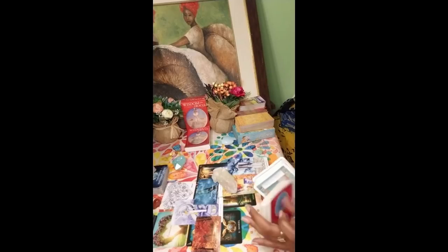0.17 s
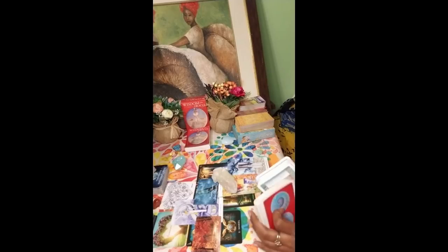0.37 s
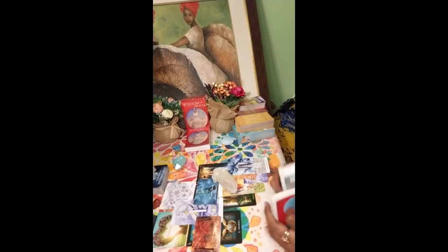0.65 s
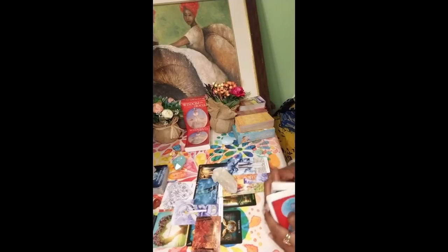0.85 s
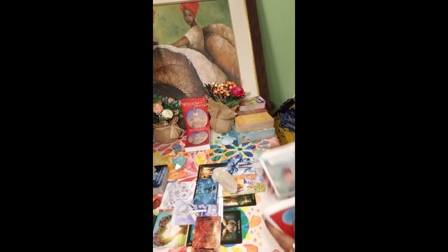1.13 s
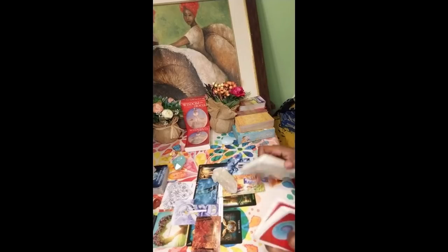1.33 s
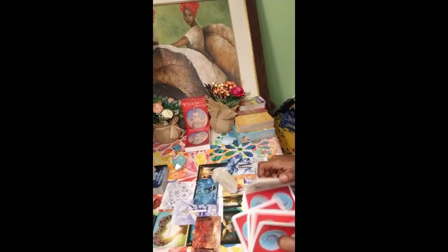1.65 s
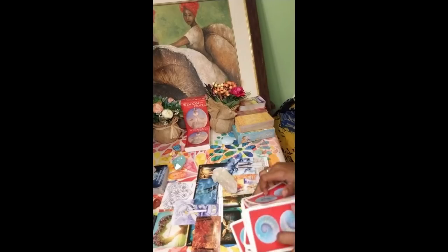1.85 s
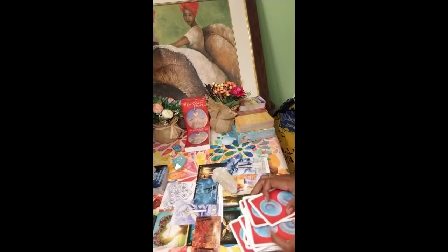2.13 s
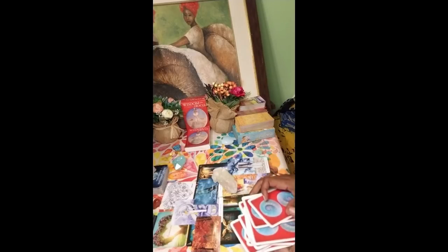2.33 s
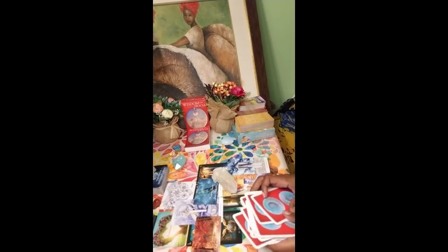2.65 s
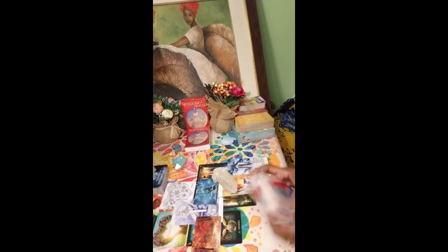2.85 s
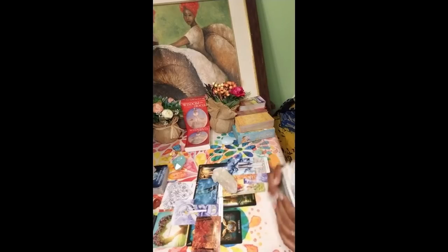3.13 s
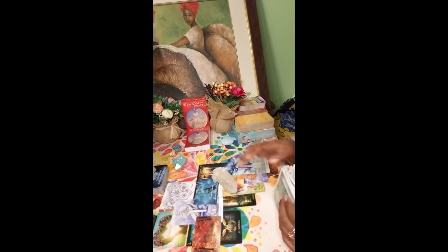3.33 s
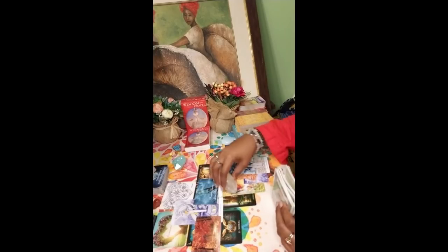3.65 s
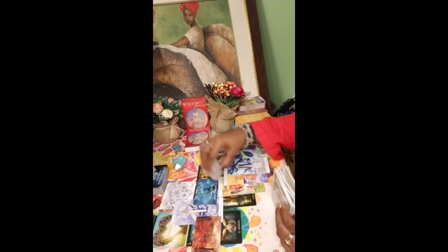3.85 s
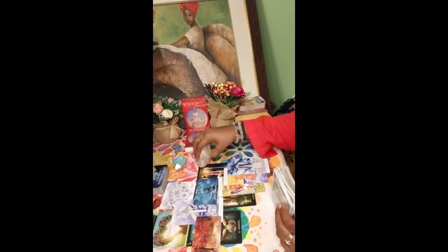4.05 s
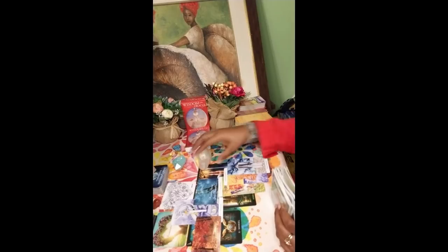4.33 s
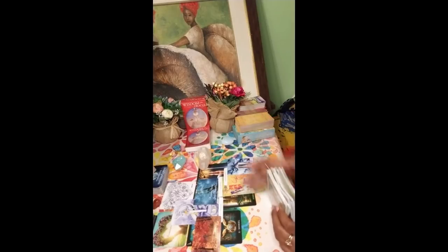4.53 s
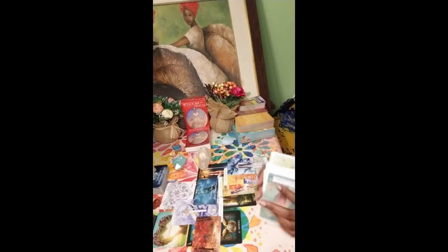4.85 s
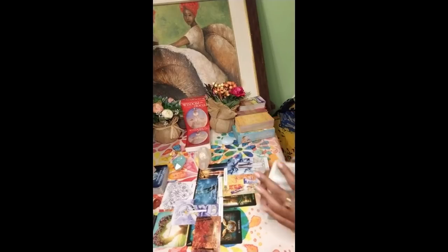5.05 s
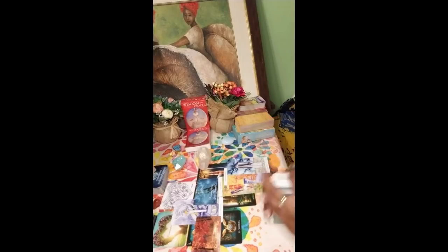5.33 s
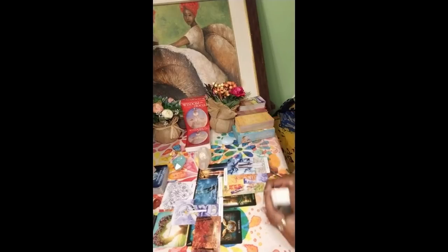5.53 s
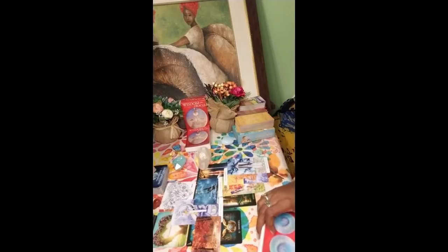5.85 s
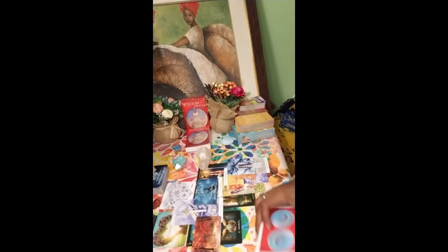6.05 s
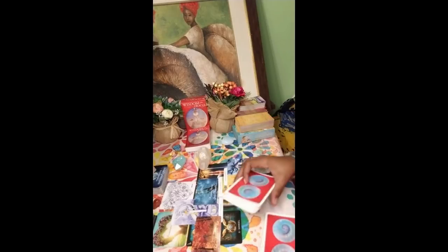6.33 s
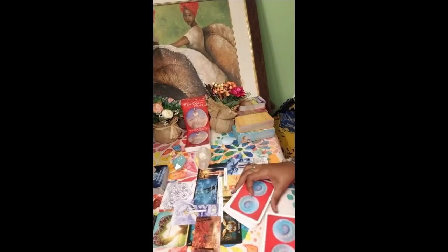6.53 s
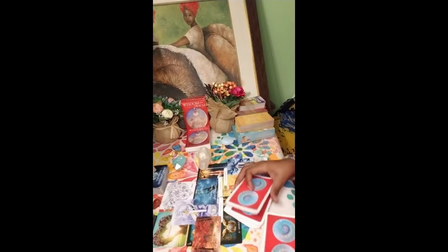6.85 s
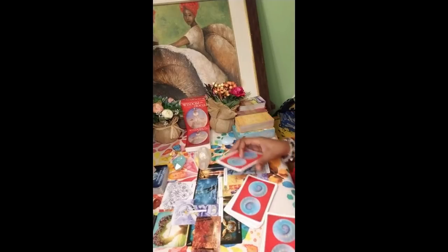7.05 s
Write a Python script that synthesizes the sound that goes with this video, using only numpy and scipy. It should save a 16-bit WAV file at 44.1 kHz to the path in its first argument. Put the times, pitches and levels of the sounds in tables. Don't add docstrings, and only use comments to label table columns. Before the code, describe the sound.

Close card handling: dull table thumps, a quick crackling riffle, papery rubs and small clicks, with faint birdsong outside and a rooster starting at the end.

```python
import sys
import numpy as np
from scipy import signal
from scipy.fft import rfft, irfft, next_fast_len
from scipy.io import wavfile
from scipy.ndimage import map_coordinates

SR = 44100
rng = np.random.default_rng(int(sys.argv[2]) if len(sys.argv) > 2 else 0)


def voltage_ratio(level):
    return 10 ** (np.asarray(level, float) / 20)


def dump(signal):
    limited = np.clip(np.atleast_2d(signal).T, -1, 1)
    pcm = np.round(limited * 32767).astype(np.int16)
    wavfile.write(sys.argv[1], SR, pcm)


N = 316544


def unit(x):
    return x / np.sqrt(np.mean(x ** 2) + 1e-20)


def along(points, hz):
    f, v = np.transpose(points)
    return np.interp(np.log(hz + 1), np.log(f + 1), v)


def curves(rows):
    s, *columns = np.transpose(rows)
    return [np.interp(np.arange(N) / SR, s, column) for column in columns]


def wobble(rate):
    knots = rng.standard_normal(int(N * rate / SR) + 4)
    return map_coordinates(knots, [np.arange(N) * rate / SR])


def filtered(x, response):
    m = next_fast_len(N + SR // 2)
    return irfft(rfft(x, m) * response(np.fft.rfftfreq(m, 1 / SR)), m)[..., :N]


def modes(table):
    def response(f):
        total = 0
        for k, (centre, width, db) in enumerate(table):
            damping = 1j * f * width
            total = total + (-1) ** k * voltage_ratio(db) * damping / (centre * centre - f * f + damping)
        return total
    return response


def noise(spectrum, grain=1):
    return unit(filtered(grain * rng.standard_normal(N), lambda hz: voltage_ratio(along(spectrum, hz))))


def add(track, s, sound):
    part = track[round(s * SR):][:len(sound)]
    part += sound[:len(part)]


# [pitch_hz, t60_s]
REVERB_TIME = [(100, 0.25), (600, 0.21), (3000, 0.28), (12000, 0.11)]


def room(x, wet_db):
    out = x.copy()
    for piece in np.array_split(np.arange(N), 16):
        hz, t, z = signal.stft(rng.standard_normal(SR // 2), SR, nperseg=256)
        t60_s = np.clip(along(REVERB_TIME, hz), .03, 1)[:, None]
        tail = signal.istft(z * voltage_ratio(-60 * t / t60_s), SR, nperseg=256)[1]
        tail /= np.linalg.norm(tail)
        add(out, piece[0] / SR + .004, voltage_ratio(wet_db) * signal.fftconvolve(x[piece], tail))
    return out


# [pitch_hz, level_db per Hz]
AIR_COLOUR = [(12, -43), (20, -4.5), (124, -1.5), (242, -16.5), (320, -16.5), (1230, -28), (2850, -30.5),
              (4340, -24.5), (5910, -25.5), (6610, -26.5), (12200, -36.5), (14900, -34), (16200, -49)]
# [pitch_hz, width_hz, level_db]
MOTOR_HUM = (123.6, 18, -69.5)
# [pitch_hz, width_hz, level_db]
INSECT_CHORUS = [(4410, 250, -86), (6550, 150, -86)]


def air():
    bands = np.zeros(N)
    for hz, width_hz, db in [MOTOR_HUM] + INSECT_CHORUS:
        band = unit(filtered(rng.standard_normal(N), modes([(hz, width_hz, 0)])))
        bands += voltage_ratio(db + 3.7 * wobble(3)) * band
    return voltage_ratio(-62.5 + 0.11 * wobble(1.5)) * noise(AIR_COLOUR) + bands


# [pitch_hz, level_db per Hz]
RUB_COLOUR = [(710, -8), (1200, -5.5), (1730, -5.5), (2360, -2), (3790, -5.5), (4410, -4.5), (5730, -7),
              (8000, -17), (10400, -55), (17600, -120)]
# [pitch_hz, level_db per Hz]
SHEEN_COLOUR = [(4500, -120), (6000, -6), (8000, 0), (12000, -4), (16000, -7)]
# [pitch_hz, level_db per Hz]
BODY_COLOUR = [(150, -120), (250, 4.5), (500, 1), (1000, -5.5), (1500, -20), (2200, -120)]
# [time_s, level_db]
HAND_RUB = [(0, -67), (.3, -68), (.64, -76), (1.3, -78), (1.5, -72), (1.74, -58), (1.92, -65), (2.24, -67),
            (2.7, -70), (2.9, -63), (3.3, -68), (4.14, -80), (4.55, -70), (4.72, -59), (4.92, -72),
            (5.8, -70), (6.3, -78), (7.18, -70)]
# [peak_s, fall_s, level_db]
PACKET_SLIPS = [(1.525, .011, -56), (1.556, .018, -51.5), (1.582, .015, -48), (1.63, .017, -52),
                (1.663, .014, -43), (1.71, .017, -64), (1.745, .021, -59), (1.789, .011, -53),
                (1.813, .014, -50), (1.848, .035, -45), (1.988, .04, -63)]
# [peak_s, fall_s, rub_db, sheen_db, body_db]
CARD_STROKES = [(.15, .21, -88, -71, -72), (.91, .056, -60, -70, -65), (2.42, .037, -60.5, -69, -73),
                (2.95, .042, -58, -68, -61.5), (3.18, .037, -60.5, -61, -56.5),
                (3.45, .015, -55.5, -64, -87), (3.49, .1, -64.5, -75, -92),
                (3.86, .041, -56.5, -66.5, -65.5), (4.34, .04, -70, -72, -77),
                (4.608, .017, -57.5, -61, -61), (4.64, .016, -61.5, -63, -69),
                (4.699, .034, -58.5, -59.5, -79), (4.775, .024, -67.5, -69, -65),
                (4.87, .049, -65, -62.5, -72.5), (5.12, .09, -69, -67.5, -59.5),
                (5.385, .044, -75, -70, -77), (5.799, .005, -67, -70, -76), (5.85, .021, -74, -71, -81),
                (5.901, .056, -71, -70, -62), (6.487, .035, -57.5, -60.5, -59), (7.05, .1, -80, -80, -70)]
# [peak_s, length_s, level_db]
FINGER_SKIMS = [(4.48, 0.0087, -65), (4.502, .01, -60), (4.52, .004, -64), (5.858, .003, -70),
                (5.91, .008, -64), (6.43, .006, -74), (6.468, 0.016, -61)]


def slide():
    t = np.arange(N) / SR
    band_db = np.array([[0], [-4], [-3]])
    drift_db = 2.5 * np.array([wobble(6), wobble(6), wobble(6)])
    gains = voltage_ratio(curves(HAND_RUB)[0] - 8.5 + band_db + drift_db)
    slips = [(s, fall_s, db, db - 12, db + 2.5) for s, fall_s, db in PACKET_SLIPS]
    for s, fall_s, *dbs in slips + CARD_STROKES:
        near = slice(max(round((s - .4) * SR), 0), round((s + .7) * SR))
        rise_s = min(.45 * fall_s, .025)
        slope_s = np.clip(np.where(t[near] < s, rise_s, fall_s), .002, .2)
        gains[:, near] += voltage_ratio(np.array(dbs))[:, None] * np.exp(-np.abs(t[near] - s) / slope_s)
    grain = voltage_ratio(1.1 * wobble(80) + 2.8 * wobble(900))
    colours = (RUB_COLOUR, SHEEN_COLOUR, BODY_COLOUR)
    rub = sum(gain * noise(colour, grain) for gain, colour in zip(gains, colours))
    skim = sum(voltage_ratio(db) * np.exp(-((t - s) / length_s) ** 2) for s, length_s, db in FINGER_SKIMS)
    return rub + skim * noise([(6000, -40), (10500, -1), (16000, -4)])


# [start_s, boom_db, boom_hz, board_db, top_db], the last two relative to the boom
DECK_KNOCKS = [(.116, -34, 128, -18, -45), (.857, -31.5, 96, -5, -8), (.893, -26, 138, -5, 1.5),
               (.901, -22.5, 90, -22, -3.5), (.915, -27, 110, -20, -26), (.949, -37, 109, -12, -16),
               (1.509, -51, 108, 4, 10), (1.543, -40.5, 100, .6, -1.2), (1.66, -49, 220, 4, 9.5),
               (1.809, -48, 124, -4, 9.5), (1.845, -41, 118, -3, -3), (3.156, -40.5, 91.5, -12, -6),
               (3.174, -37.5, 200, 2.2, -1.2), (4.33, -31, 195, -6.5, -28), (4.345, -34, 109, -15, -30),
               (5.081, -43, 137, 2.2, -4.5), (5.092, -35, 86, -1.2, -1.2), (5.113, -36.5, 214, 5, 9.5),
               (5.344, -44, 117, 2.2, -9), (5.365, -27, 101, -9, -13.5), (5.378, -38, 116, 3, -6),
               (5.409, -43, 89, -12, -6), (6.484, -32, 80, -8, -15.5)]
# [start_s, boom_db, boom_hz, top_db], the last relative to the boom
HAND_BUMPS = [(.357, -43, 99.6, -51), (1.979, -57, 81, 5), (3.347, -46.5, 107, -21), (4.119, -51, 97, -25),
              (4.167, -41, 128, -33), (4.184, -49, 105, -29), (4.608, -51, 97, -6), (4.769, -49, 108, -3.5),
              (5.888, -45.5, 98, -12.5), (6.063, -49, 137, -27)]
# [ratio to boom_hz, width_hz, level_db]
FRAME_MODES = [(.62, 41.2, -3), (0.999, 45, -0.5)]
# [pitch_hz, width_hz, level_db]
BOARD_MODES = [(274, 49, 0), (337, 92, -7.5), (407.5, 36, -6.5)]
# [pitch_hz, width_hz, level_db]
TOP_MODES = [(510, 56, -5), (628, 30, 1.5), (725, 89, -11), (930, 69, -18.5), (1170, 110, -19)]


def knocks():
    out, t = np.zeros(N), np.arange(8192) / SR
    soft = np.hanning(44)

    def ringing(part, scale):
        total = np.zeros(len(t))
        for k, (hz, width_hz, db) in enumerate(part):
            decay = voltage_ratio(db - 31.4 * width_hz * t) * width_hz
            total += (-1) ** k * decay * np.sin(2 * np.pi * scale * hz * t)
        return total

    board, top = ringing(BOARD_MODES, 0.93), ringing(TOP_MODES, 0.96)
    bumps = [(s, db, hz, -15, top_db) for s, db, hz, top_db in HAND_BUMPS]
    contact_s = .0045
    for s, db, boom_hz, board_db, top_db in DECK_KNOCKS + bumps:
        ragged = np.exp(-t[:1024] / contact_s) * 0.11 * rng.standard_normal(1024)
        ragged[0] -= 1
        blow = np.convolve(ragged, soft)
        rings = (ringing(FRAME_MODES, boom_hz), board, top)
        for ring, part_db in zip(rings, (db - 1.5, db + board_db + 0.5, db + top_db)):
            sound = signal.fftconvolve(blow, ring)
            add(out, s, voltage_ratio(part_db) * sound / np.abs(sound).max())
    return filtered(out, lambda hz: (1j * hz / (45 + 1j * hz)) ** 2)


# [start_s, peak_db, ring_hz, sheen_db]
LONE_TICKS = [(.272, -49, 5160, -61), (2.4106, -48, 3900, -65), (2.5266, -55, 4310, -73),
              (2.9267, -41.5, 3340, -60), (2.9687, -36.5, 2570, -68), (3.4349, -48, 2300, -62),
              (3.4414, -42.5, 3630, -60), (3.479, -32, 4130, -58), (3.8388, -30.5, 3830, -46),
              (3.8462, -32, 2930, -42), (4.3263, -48.5, 3810, -50), (4.3328, -42, 3960, -51),
              (4.6483, -50, 2790, -53), (4.663, -53, 2700, -63), (4.685, -38.5, 4370, -54),
              (4.7725, -41, 2480, -55), (5.6175, -57, 4590, -53), (5.7996, -55, 4270, -50),
              (5.8986, -52, 5340, -52)]
# [start_s, level_db]
DISH_RATTLES = [(0.902, -38), (5.117, -68), (5.377, -54)]
# [start_s, peak_db, ring_hz, push_db]
RIFFLED_EDGES = [(1.5269, -37, 2760, -30), (1.544, -46, 2490, -33), (1.5534, -36, 2260, -52),
                 (1.5646, -26.5, 2260, -27), (1.5694, -34, 2890, -66), (1.6131, -24, 2980, -30),
                 (1.6174, -19.5, 2410, -22), (1.6576, -26, 2420, -32), (1.664, -27.5, 2550, -45),
                 (1.6668, -22.5, 3000, -26), (1.7039, -28, 2820, -30), (1.734, -24, 1950, -38),
                 (1.7859, -31, 1900, -38), (1.8076, -40.5, 2490, -28), (1.814, -39, 1870, -49),
                 (1.83, -46, 2240, -32), (1.838, -20, 2330, -19), (1.841, -36, 2650, -45),
                 (1.8503, -19.5, 4630, -22), (1.8858, -42, 3220, -35), (1.9808, -44.5, 2200, -40),
                 (2.032, -56, 3060, -46), (2.062, -41.5, 4960, -43)]


def snaps():
    ring, hiss, push = np.zeros((3, N))
    t = np.arange(1024) / SR
    riffle = [(s, db, hz, -56 + .4 * (db + 35), push_db) for s, db, hz, push_db in RIFFLED_EDGES]
    ticks = [(*row, -62) for row in LONE_TICKS]
    for s, db, hz, sheen_db, push_db in riffle + ticks:
        dice = rng.standard_normal((3, len(t)))
        tone = np.sin(2 * np.pi * hz * t) + 0.46 * np.sin(2 * np.pi * 1.49 * hz * t) + 0.93 * dice[0]
        add(ring, s, voltage_ratio(db - 60 * t / 0.0058) * tone)
        add(hiss, s, voltage_ratio(sheen_db + 5 - 60 * t / 0.0051) * dice[1])
        add(push, s, voltage_ratio(push_db + 5 - 60 * t / 0.022) * dice[2])
    for s, db in DISH_RATTLES:
        swell = 1 - np.exp(-t / 0.00074)
        add(ring, s, voltage_ratio(db - 60 * t / 0.025) * swell * np.sin(2 * np.pi * 2740 * t))
    card = filtered(filtered(ring, modes([(2840, 3200, 0)])), modes([(2960, 4100, 0)]))
    return card + filtered(hiss, modes([(10000, 9000, 0)])) + filtered(push, modes([(670, 680, 0)]))


# [start_s, level_db]
BIRD_CALLS = [(.79, -67), (2.167, -63.5), (2.893, -62), (3.671, -64), (4.54, -66)]
# [delay_s, length_s, start_hz, end_hz, trill_depth_hz, level_db]
CALL_NOTES = [
    (0, .06, 3450, 3320, 110, 0),
    (.052, .09, 2790, 2530, 400, 0),
]
# [start_s, length_s, start_hz, end_hz, level_db]
LOW_SLURS = [
    (2.395, .31, 2100, 1890, -78.5),
    (2.791, .17, 2030, 2360, -66.5),
    (3.085, .14, 2700, 2190, -64),
    (3.273, .23, 1992, 2420, -69.5),
]


def bird():
    song, waver = np.zeros(N), wobble(260)
    calls = [(s + delay_s, *shape, db + note_db)
             for s, db in BIRD_CALLS for delay_s, *shape, note_db in CALL_NOTES]
    slurs = [(*shape, 17 * (db + 84), db) for *shape, db in LOW_SLURS]
    for s, length_s, start_hz, end_hz, depth_hz, db in calls + slurs:
        u = np.linspace(0, 1, round(length_s * SR))
        trill = .7 * np.sin(2 * np.pi * 38 * length_s * u) + .6 * waver[round(s * SR):][:len(u)]
        hz = start_hz + (end_hz - start_hz) * u + depth_hz * trill
        swell = np.sin(np.pi * u) ** .5
        add(song, s, voltage_ratio(db - 1) * swell * np.sin(2 * np.pi * np.cumsum(hz) / SR))
    return room(song, wet_db=2)


# [time_s, pitch_hz, effort_db]
CROW_EFFORT = [(6.9, 650, -90), (6.945, 650, -70), (6.99, 683, -62), (7.03, 681, -55), (7.08, 680, -52),
               (7.11, 682, -53), (7.145, 677, -49), (7.18, 684, -49)]
# [multiple, level_db at full effort, growth in dB per dB of effort]
CROW_OVERTONES = [(1, 0, 1), (2, -13, .35), (3, -13, 1.5), (3.72, -27, 1.5), (6, -28, .8), (7, -25, .6),
                  (10, -30, 1.2), (11, -25, 1.5), (13, -29, 1.2)]


def crow():
    hz, effort_db = curves(CROW_EFFORT)
    turn = 2 * np.pi * np.cumsum(hz * (1 + .004 * wobble(60))) / SR
    full_db = effort_db.max()
    cry = np.zeros(N)
    for k, db, grows in CROW_OVERTONES:
        flutter_db = 2.2 * min(k, 2) * wobble(55)
        level_db = full_db + db + grows * (effort_db - full_db) + flutter_db
        cry += voltage_ratio(level_db) * np.sin(k * turn + 0.2 * k * wobble(150))
    return cry * (np.arange(N) / SR > CROW_EFFORT[0][0])


# [pitch_hz, level_db under the middle]
CHANNEL_SPREAD = [(100, -46), (1000, -38), (3000, -29.5), (6000, -19.5), (10000, -10), (15000, -7.5)]


def scene():
    cards = room(snaps() + slide(), wet_db=-11)
    mid = cards + room(knocks(), wet_db=-5.5) + bird() + crow() + air()
    hz, _, z = signal.stft(mid, SR, nperseg=256)
    scramble = np.exp(2j * np.pi * rng.random(z.shape))
    side = signal.istft(z * voltage_ratio(along(CHANNEL_SPREAD, hz))[:, None] * scramble, SR, nperseg=256)[1][:N]
    return np.array([mid + side, mid - side])


def roll_off(x):
    return signal.sosfilt(signal.butter(12, 16510, fs=SR, output="sos"), x)


def record(dry):
    mix = filtered(dry, lambda hz: np.where(hz < 15850, 1, voltage_ratio(-30)))
    return roll_off(mix)


dry = scene()
out = record(dry)
dump(out)
```